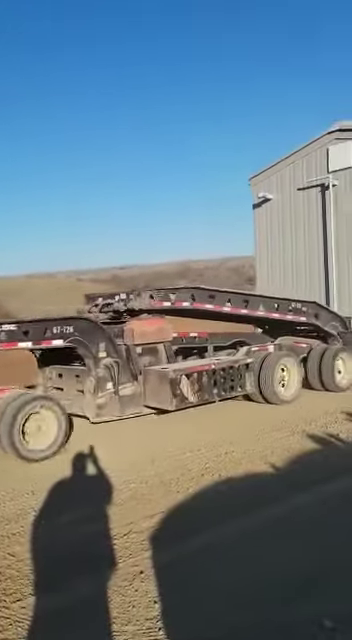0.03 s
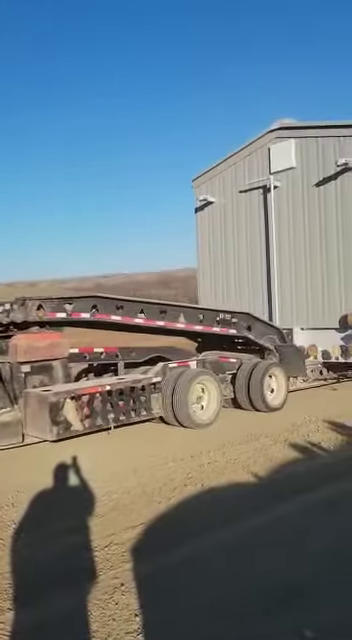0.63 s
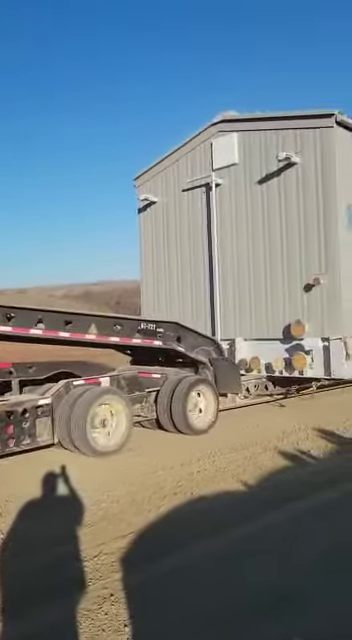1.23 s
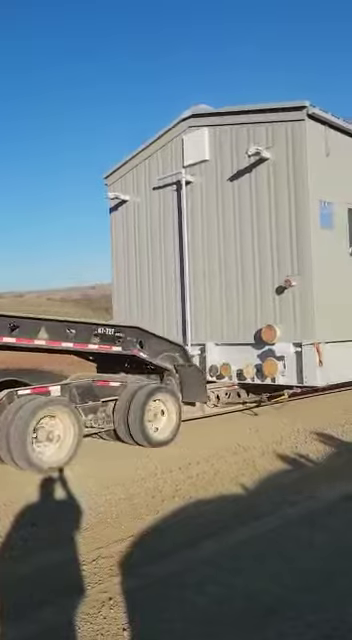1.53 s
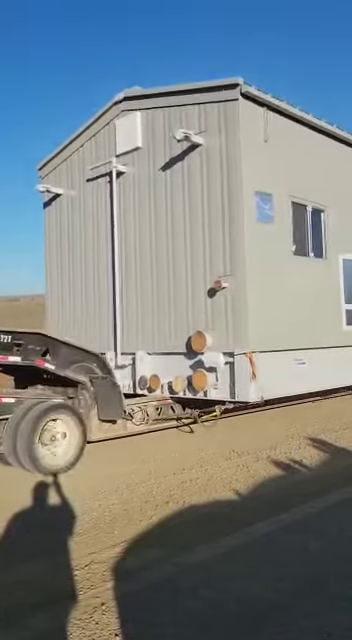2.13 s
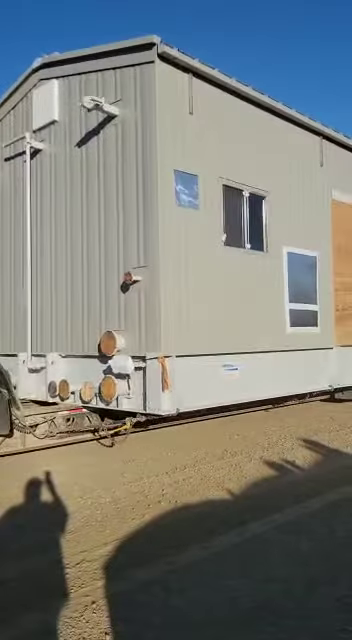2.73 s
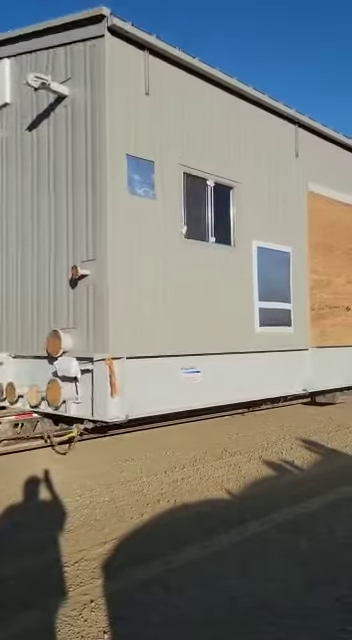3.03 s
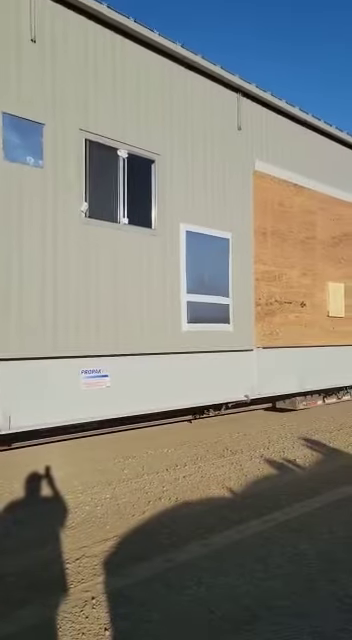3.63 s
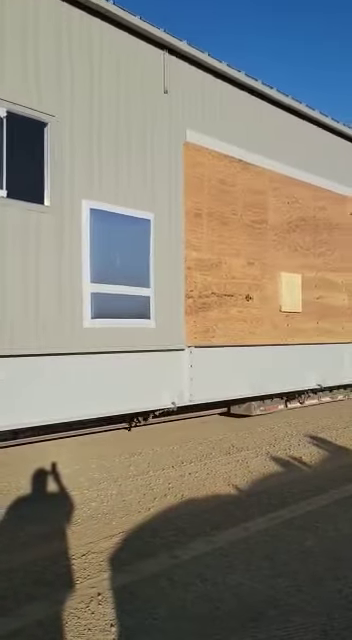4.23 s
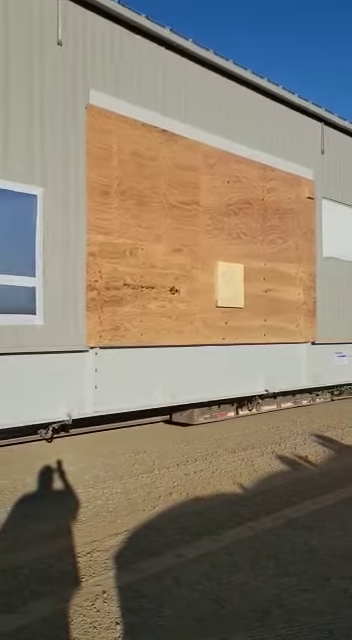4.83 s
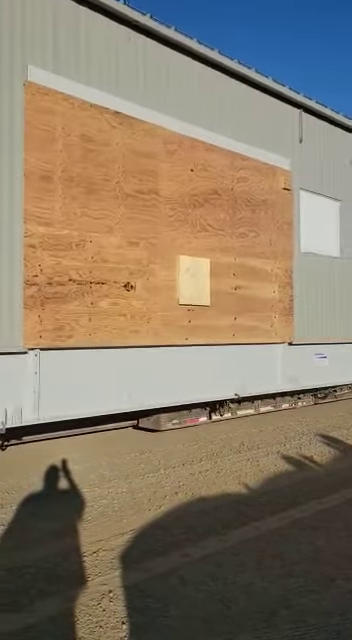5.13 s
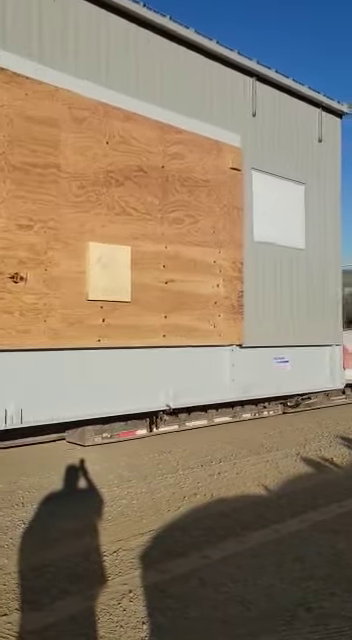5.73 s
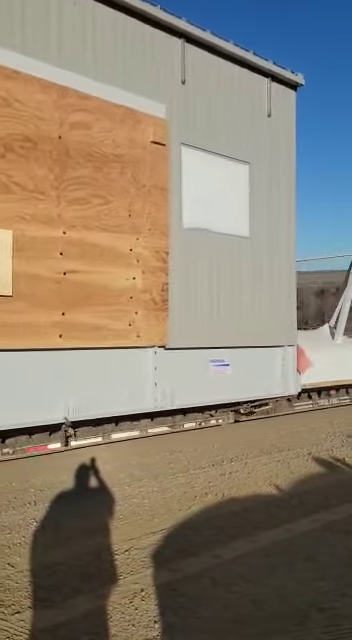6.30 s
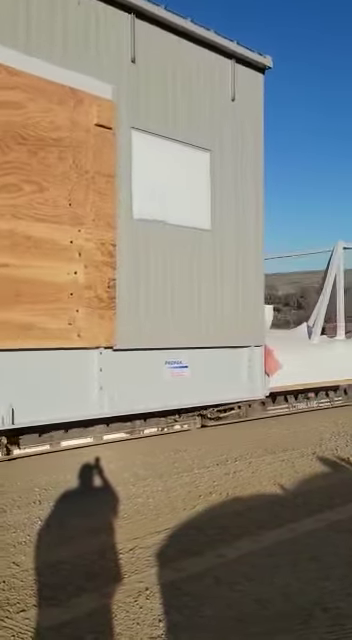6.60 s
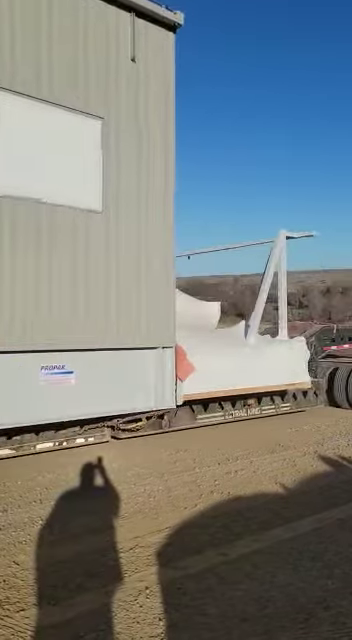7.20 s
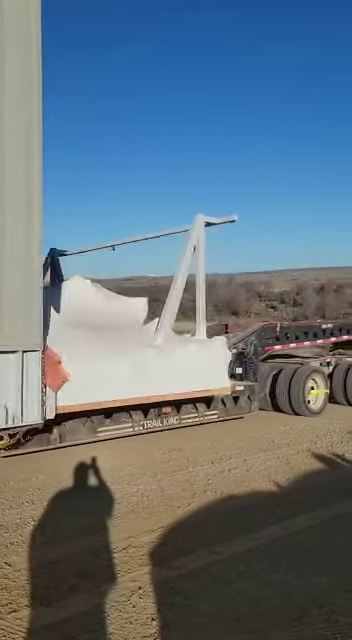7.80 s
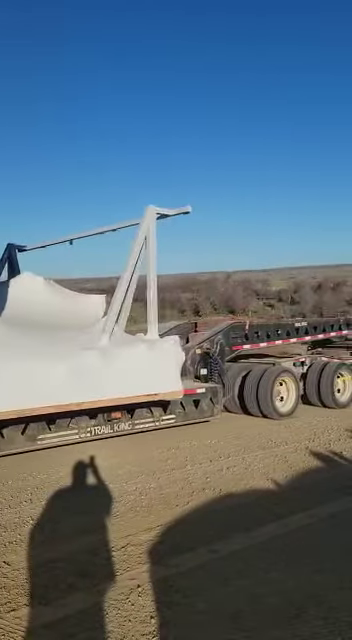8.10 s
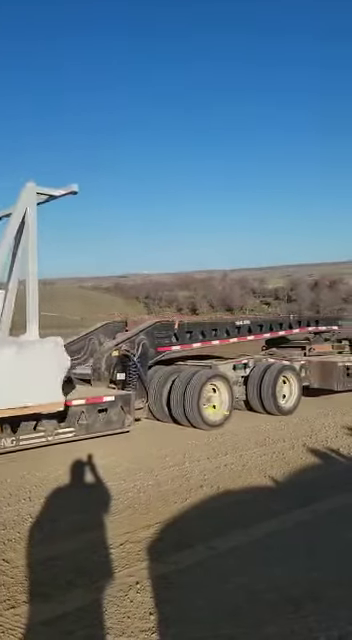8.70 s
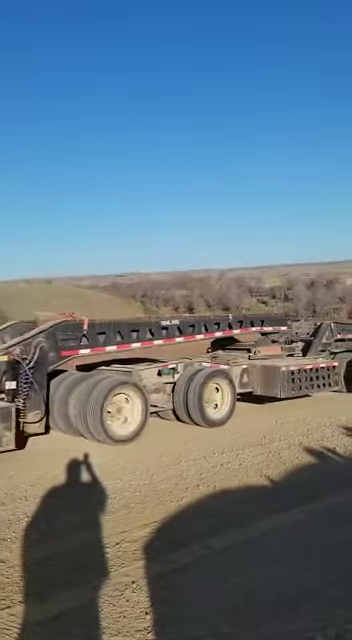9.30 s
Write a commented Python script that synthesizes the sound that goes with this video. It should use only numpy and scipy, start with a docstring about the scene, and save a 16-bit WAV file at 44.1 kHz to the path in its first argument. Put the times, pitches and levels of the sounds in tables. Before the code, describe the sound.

Heavy diesel trucks roar slowly past on a dirt road, with droning fans, brief turbo whistles and tyres crunching grit.

```python
"""Two trucks hauling a building

Two diesel trucks, one pulling and one pushing, move a building on a long trailer along a dirt road.
The lead truck roars close by and draws away. The two exhaust notes beat against each other, a cooling
fan drones and a turbocharger whistles. An air valve spits once, the trailer's steel rings and knocks,
and its tyres crunch grit as they roll past a microphone with two openings (ports), left and right."""
import sys
import numpy as np
from scipy import signal
from scipy.fft import rfft, irfft, next_fast_len
from scipy.io import wavfile

SR = 44100
rng = np.random.default_rng(int(sys.argv[2]) if len(sys.argv) > 2 else 0)


def wav_out(sig):
    """Save sig, one row per channel (or a flat mono array), as 16-bit PCM at SR to the path in sys.argv[1]."""
    wavfile.write(sys.argv[1], SR, np.round(np.clip(np.atleast_2d(sig).T, -1, 1) * 32767).astype(np.int16))


N = 412335
TIME = np.arange(N) / SR
FFT_SIZE = next_fast_len(N)
FFT_HZ = np.fft.rfftfreq(FFT_SIZE, 1 / SR)


def gain_of(db):
    """Turns decibels into a number to multiply by."""
    return 10 ** (np.asarray(db) / 20)


def evened(x):
    """Scales a sound to an average strength (rms) of one."""
    return x / np.sqrt(np.mean(x ** 2) + 1e-20)


def curves(rows, t=TIME):
    """Joins the points of each table column with straight lines in time."""
    times, *columns = np.transpose(rows)
    return [np.interp(t, times, column) for column in columns]


def spectra(rows, hz):
    """Joins the points of each table column from low pitch to high."""
    pitches, *columns = np.transpose(rows)
    return [np.interp(np.log(hz + 1), np.log(pitches), column) for column in columns]


def coloured(x, spectrum):
    """Shapes a sound by rows of (pitch_hz, relative_db), then sets its strength to one."""
    db, = spectra(spectrum, FFT_HZ)
    return evened(irfft(rfft(x, FFT_SIZE) * gain_of(db), FFT_SIZE)[..., :N])


def band(hz, pitch_hz, log_width):
    """Keeps what lies near one pitch; a log_width of 0.7 reaches about an octave each way."""
    return np.exp(-(np.log((hz + 1) / pitch_hz) / log_width) ** 2)


def noise():
    """Two unrelated white noises."""
    return rng.standard_normal((2, N))


def wander(rate_hz):
    """A random wobble of strength one, up to about rate_hz fast."""
    steps = np.arange(2048) / 200
    keep_slow = 1 / (1 + (np.fft.rfftfreq(len(steps), steps[1]) / rate_hz) ** 4)
    wobble = irfft(rfft(rng.standard_normal(len(steps))) * keep_slow)
    return np.interp(TIME, steps, evened(wobble))


def tone(hz, db, flutter, rate_hz):
    """A note whose strength and phase flutter at random."""
    angle = 2 * np.pi * (np.cumsum(hz) / SR + rng.random())
    wave = (1 + flutter * wander(rate_hz)) * np.cos(angle) + flutter * wander(rate_hz) * np.sin(angle)
    return gain_of(db) * np.sqrt(2) * wave


def restless(angle, half_width_hz):
    """Noise so narrow that it sounds like an unsteady note."""
    return wander(half_width_hz) * np.cos(angle) + wander(half_width_hz) * np.sin(angle)


def swell(middle_s, half_length_s):
    """A smooth hump of height one around a moment."""
    return np.exp(-((TIME - middle_s) / half_length_s) ** 2)


def passing(near_db, fall_db, side_m, emerge_db):
    """Level in dB of a source rolling by side_m away; it loses fall_db each time the distance doubles."""
    speed_m_per_s, closest_s = 1.89, 0.17
    distance_m = np.hypot(side_m, speed_m_per_s * (TIME - closest_s))
    # the level shifts by emerge_db as the push truck comes out from behind the building
    emerge_s, takes_s = 8.84, 0.28
    emerged = (1 + np.tanh(2 * (TIME - emerge_s) / takes_s)) / 2
    return near_db - fall_db * np.log2(distance_m / side_m) + emerge_db * emerged


# how far the lead truck has gone behind its load: time_s, share_0_to_1
AWAY = [(0, 0.18), (1.8, 0.15), (3.2, 0.71), (6, 0.88), (9.35, 0.92)]

def receding(x, near, far):
    """Fades from the near tone colour to the far one as the truck draws away."""
    away, = curves(AWAY)
    return evened((1 - away) * coloured(x, near) + away * coloured(x, far))


# how the ports differ, truck near and far: pitch_hz, left_minus_right_db, likeness_0_to_1, left_lead_rad
PORTS_NEAR = [(77, -0.7, 0.999, 0.13), (125, -0.6, 0.999, 0.03), (290, -3.6, 0.984, -0.46),
              (520, -8.4, 0.88, -0.74), (1100, -8.5, 0.73, -1.43), (1600, -11.1, 0.35, -0.82),
              (2100, -5.8, 0.77, 0.1), (2600, 5.7, 0.56, 1.75), (3100, -0.5, 0.74, 3.0),
              (4200, -8.0, 0.59, 3.02), (6300, -9.1, 0.27, 2.95), (7400, -1.6, 0.27, 0.42),
              (9500, -2.5, 0.14, -0.68), (13500, -7.1, 0.02, 0.91)]
PORTS_FAR = [(77, -0.6, 0.987, 0.16), (125, -0.6, 0.979, 0.04), (290, -0.8, 0.972, -0.38),
             (520, -4.7, 0.88, -0.55), (1100, -9.7, 0.8, -0.88), (1600, -10.3, 0.57, 0.53),
             (2100, -5.0, 0.8, 0.68), (2600, 2.8, 0.31, 1.46), (3100, 0.0, 0.65, 3.63),
             (4200, -8.9, 0.58, 3.74), (6300, -10.7, 0.25, 4.53), (7400, -1.8, 0.29, 7.14),
             (9500, -0.2, 0.06, 7.4), (13500, -6.6, 0.1, 7.43)]

def ports(pair):
    """Mixes two unrelated sounds into a left and right, partly alike but apart in level and phase."""
    hz, t, (common, own) = signal.stft(pair, SR, nperseg=2048)
    away, = curves(AWAY, t)
    near_db, near_like, near_turn = spectra(PORTS_NEAR, hz[:, None])
    far_db, far_like, far_turn = spectra(PORTS_FAR, hz[:, None])
    left_gain = gain_of((1 - away) * near_db + away * far_db)
    like = (1 - away) * near_like + away * far_like
    turn = np.exp(1j * np.angle((1 - away) * np.exp(1j * near_turn) + away * np.exp(1j * far_turn)))
    left = left_gain * (like * turn * common + np.sqrt(1 - like ** 2) * own)
    centre = np.sqrt(1 + left_gain ** 2 + 2 * left_gain * like * turn.real) / 2  # keeps the sum's level
    return signal.istft(np.array([left, common]) / centre, SR)[1][:, :N]


def far_hiss():
    """A faint, even hiss lies under everything."""
    colour = [(4000, -6), (7600, 0), (8400, 2), (9000, -13), (12000, -12), (15000, -22)]
    return gain_of(-72) * coloured(noise(), colour)


def breeze():
    """Light air buffets each port on its own."""
    colour = [(12, -6), (28, -4), (50, 7), (100, -10), (400, -43), (2000, -90)]
    return gain_of(-48 + 3.8 * wander(3)) * coloured(noise(), colour)


# tone colour of the sizzle: pitch_hz, relative_db
SIZZLE = [(8800, -30), (9350, -16), (9520, 7), (9700, -2), (10300, -31)]

def sizzle():
    """A thin, high sizzle fades as the trucks move on."""
    db = passing(near_db=-65.5, fall_db=11, side_m=7, emerge_db=-2)
    return gain_of(db) * coloured(noise()[0], SIZZLE)


# notes of the trailer's loose steel: pitch_hz, half_width_hz, level_db
STEEL_NOTES = [(1450, 9, -53), (1695, 13, -51), (3698, 18, -59), (4850, 16, -54), (4905, 22, -55),
               (6525, 18, -63)]

def loose_steel():
    """The rough road shakes loose steel, which rings faintly as the front wheels go by."""
    notes = sum(gain_of(db) * restless(2 * np.pi * hz * TIME, width) for hz, width, db in STEEL_NOTES)
    return swell(middle_s=3.2, half_length_s=0.6) * notes


# jolts to the trailer: start_s, level_db
KNOCKS = [(8.671, -26.5), (8.858, -30), (8.892, -32.5)]
# notes of its frame: pitch_hz, relative_db, ring_s (time to fade by 60 dB)
FRAME_NOTES = [(772, -5, 0.24), (910, -4, 0.087), (983, -5.5, 0.13), (1100, -7, .08), (1803, -13, .15)]

def frame_knocks():
    """Each jolt sets the trailer's steel frame ringing."""
    out = np.zeros(N)
    for start_s, blow_db in KNOCKS:
        t = np.maximum(TIME - start_s, 0)
        for hz, db, ring_s in FRAME_NOTES:
            out += gain_of(blow_db + db - 60 * t / ring_s) * np.sin(2 * np.pi * hz * t)
    return out


# swells of a dry rasp: middle_s, half_length_s, pitch_hz, level_db
RASPS = [(0.25, 0.56, 3380, -50), (1.65, 0.87, 2020, -37), (3.3, 0.76, 850, -39), (6.0, 0.35, 1960, -45),
         (7.0, 0.15, 1960, -44), (8.3, 1.0, 2600, -52)]

def rasp():
    """A narrow band of coarse noise comes and goes."""
    coarse = rfft(noise() * gain_of(1.5 * wander(36)), FFT_SIZE)
    out = np.zeros((2, N))
    for middle_s, half_s, pitch_hz, db in RASPS:
        narrow = irfft(coarse * band(FFT_HZ, pitch_hz, log_width=0.17), FFT_SIZE)[:, :N]
        out += gain_of(db) * swell(middle_s, half_s) * evened(narrow)
    return out


# stones popping under the tyres: start_s, level_db, pitch_hz, log_width
STONES = [(2.412, -31, 6200, 0.18), (3.334, -31, 6250, 0.18), (5.47, -34, 4200, 0.36),
          (5.5, -52, 12500, 0.24), (6.052, -29, 2900, 0.65), (6.078, -35, 4000, .5),
          (6.129, -32, 3700, 0.46), (6.143, -34, 3700, .5), (7.915, -54, 10000, .3),
          (8.87, -53, 12000, .25), (9.06, -53, 12970, .25)]

def stones(attack_s=0.0015, decay_s=0.0084, left_db=-11):
    """Each stone cracks with a short, bright burst, weaker on the left."""
    out = np.zeros((2, N))
    t = np.arange(4096) / SR
    hz = np.fft.rfftfreq(len(t), 1 / SR)
    envelope = np.minimum(t / attack_s, 1) * np.exp(-t / decay_s)
    for start_s, db, pitch_hz, log_width in STONES:
        white = rng.standard_normal((2, len(t)))
        burst = evened(irfft(rfft(white) * band(hz, pitch_hz, log_width))) * envelope
        part = out[:, round(start_s * SR):][:, :len(t)]
        part += gain_of(db) * burst[:, :part.shape[1]]
    out[0] *= gain_of(left_db)
    return out


# swells and dips in the hiss and fizz: middle_s, hiss_lift_db, fizz_lift_db
HISS_SWELLS = [(1.85, 2, 2), (3.3, 2.5, 6), (4.3, 0.5, 7), (5.45, 1, 0), (6.1, 1.1, 5), (7.7, 0, 2),
               (8.5, -0.5, 1)]
# tone colours of the hiss and the finer fizz above it: pitch_hz, relative_db
HISS = [(2000, -16), (2900, -0.5), (3170, 0.5), (3720, 1.5), (4350, -0.7), (4880, 2.5), (5450, -4),
        (5850, -2.5), (6300, -0.2), (6750, -2), (7150, -11), (8100, -12), (8700, -50), (11000, -38)]
FIZZ = [(7000, -3.5), (8700, -10.5), (9500, -2.5), (10800, -12), (12300, -5), (14000, -4), (15100, 1),
        (15800, -5.5)]

def tyres(grains_per_s=900, crumble_s=0.002, swell_s=0.53):
    """Air rushes, and grit is crushed in clumps under the treads."""
    hiss_db = passing(near_db=-40.5, fall_db=6.5, side_m=6.5, emerge_db=1.5)
    fizz_db = passing(near_db=-42.5, fall_db=10, side_m=1.72, emerge_db=10)
    for middle_s, hiss_lift_db, fizz_lift_db in HISS_SWELLS:
        hiss_db += hiss_lift_db * swell(middle_s, swell_s)
        fizz_db += fizz_lift_db * swell(middle_s, swell_s)
    clumps = wander(18)
    chance = grains_per_s / SR * gain_of(3 * clumps)  # clumps crowd and thin the grains
    strength = gain_of(3 * np.minimum(rng.exponential(1, N), 4))
    grains = strength * rng.choice([-1, 1], N) * (rng.random(N) < chance)
    crumble = rng.standard_normal((2, 512)) * np.exp(-np.arange(512) / SR / crumble_s)
    grit = evened(signal.oaconvolve(grains[None], crumble, axes=1)[:, :N])
    hiss = gain_of(hiss_db + 0.55 * clumps) * coloured(noise() + 0.36 * grit, HISS)
    fizz = gain_of(fizz_db + clumps) * coloured(noise() + 0.55 * grit, FIZZ)
    return hiss + fizz


# tone colour of the valve's spit: pitch_hz, relative_db
VALVE_AIR = [(1500, -20), (3000, 0), (4800, 1), (5500, -6), (6200, 4), (6800, -1), (7600, -2), (8800, -14),
             (9600, -10), (11000, -9), (13500, -5), (15800, -12)]

def air_valve(start_s=1.528, attack_s=0.017, hold_s=0.03, spit_db_per_s=240, leak_db_per_s=14):
    """One short spit of compressed air, then a thin leak that fades slowly."""
    opening = np.clip((TIME - start_s) / attack_s, 0, 1)
    fading_s = np.maximum(TIME - start_s - attack_s - hold_s, 0)
    spit = gain_of(-32 - spit_db_per_s * fading_s) * coloured(noise(), VALVE_AIR)
    leak = gain_of(-48.5 - leak_db_per_s * fading_s) * coloured(noise(), FIZZ)
    return opening * (spit + leak)


# turbocharger whistles: middle_s, pitch_hz, glide_hz_per_s, level_db
WHISTLES = [(1.18, 2560, -55, -42), (2.66, 2525, 40, -48), (3.0, 2543, 61, -43.5), (3.85, 2668, -58, -52),
            (6.35, 2635, -15, -65), (7.6, 2712, 9.5, -59), (8.2, 2700, -21, -53), (9.25, 2600, 68, -50)]

def turbo(swell_s=0.24):
    """The spinning turbocharger whistles in brief, gliding swells."""
    return sum(swell(s, swell_s) * tone(hz + glide * (TIME - s), db, flutter=0.25, rate_hz=14)
               for s, hz, glide, db in WHISTLES)


# a hollow howl in the lead truck's roar: time_s, pitch_hz, level_db
HOWL = [(0, 515, -35.5), (2.5, 517, -34), (3.6, 538, -36.5), (4.7, 552, -38), (5.3, 572, -48),
        (6.2, 587, -46), (7.5, 600, -57)]

def howl():
    """A narrow resonance climbs in pitch as the lead truck draws away."""
    hz, db = curves(HOWL)
    return gain_of(db) * restless(2 * np.pi * np.cumsum(hz) / SR, half_width_hz=13.4)


# fan speed, wavering at first and then following the push engine: time_s, blade_passes_hz
FAN_SPEED = [(0, 348), (1.6, 348), (1.95, 351.5), (2.65, 345), (3.1, 349), (3.6, 344.6), (4.9, 342.7),
             (6.1, 341.6), (7.0, 341.6), (7.8, 348), (9.35, 351)]
# loudness of its drone: time_s, level_db
FAN_LEVEL = [(0, -35), (0.4, -26.5), (1.05, -53), (1.55, -24), (2.25, -28.5), (2.6, -24), (2.92, -23.5),
             (3.02, -28), (3.14, -23), (3.5, -23.5), (3.8, -24.5), (4.8, -27), (6.1, -29.5), (6.9, -33),
             (7.7, -39), (8.2, -53), (8.95, -38), (9.35, -40)]

def cooling_fan():
    """The passing blades chop the air into a drone."""
    db = curves(FAN_LEVEL)[0] + 0.42 * wander(2.8)
    return tone(curves(FAN_SPEED)[0], db, flutter=0.1, rate_hz=9.8)


# push engine speed, sagging under load and picking up again: time_s, cycle_hz
PUSH_SPEED = [(0, 12.15), (1.1, 12.34), (1.6, 12.25), (2.1, 12.29), (2.6, 12.17), (3.2, 12.19),
              (4.6, 12.07), (6.9, 12.02), (7.8, 12.18), (9.35, 12.34)]
# its exhaust's swing in loudness, hidden by the building and coming out again: time_s, level_db
PUSH_LEVEL = [(0, -23), (0.5, -20.5), (1.6, -20), (2.5, -22.5), (2.72, -30), (3.2, -25), (4.3, -30),
              (4.8, -34.5), (7.1, -34.5), (7.7, -30.5), (8.3, -35.5), (9.0, -28.5), (9.35, -34)]
# its exhaust notes: cycle_multiple, relative_db, share_of_swing_0_to_1
PUSH_NOTES = [(5, -18, .1), (6, -20, .2), (7, -3.5, .3), (8, -24, .4), (9, -14.5, .1), (10, -2, 1),
              (11, -17, .5), (19, -23, .6), (22, -12, .5), (23, -12.5, .1), (24, -19.5, 1)]

def push_exhaust(steady_db=-31.5):
    """The push engine hums at multiples of its cycle; a steady part bends round the building."""
    cycle_hz, = curves(PUSH_SPEED)
    swing_db = curves(PUSH_LEVEL)[0] + 0.32 * wander(2.1)
    out = np.zeros(N)
    for multiple, db, share in PUSH_NOTES:
        level_db = (1 - share) * steady_db + share * swing_db + db
        out += tone(multiple * cycle_hz, level_db, flutter=0.0092 * multiple, rate_hz=5.9)
    return out


def whine(gear_ratio=29.9):
    """A spinning part geared to the push engine whines."""
    db = passing(near_db=-34, fall_db=11.5, side_m=9.3, emerge_db=-9)
    return tone(gear_ratio * curves(PUSH_SPEED)[0], db, flutter=0.38, rate_hz=5.6)


# lead engine speed, with the same slow sag and recovery: time_s, firing_hz
LEAD_SPEED = [(0, 78.36), (1.1, 79.25), (2.1, 76.93), (4.2, 76.73), (6.5, 76.07), (7.4, 78.1),
              (9.35, 77.14)]
# loudness of its exhaust: time_s, level_db
LEAD_LEVEL = [(0, -19.5), (0.41, -26.5), (0.85, -20), (1.45, -25), (2.6, -26), (2.9, -34), (3.55, -26.5),
              (4.2, -27), (4.9, -24.5), (5.5, -27.5), (6.85, -26.5), (7.4, -29.5), (8.1, -26.5),
              (9.35, -35)]
# its exhaust notes: cycle_multiple, relative_db
LEAD_NOTES = [(6, 1), (12, -15.5), (18, -19.5), (22, -20.5), (23, -21.5), (40, -21)]

def lead_exhaust(cylinders=6):
    """Each cylinder fires once a cycle, making notes that beat against the push truck's."""
    cycle_hz = curves(LEAD_SPEED)[0] / cylinders
    level_db = curves(LEAD_LEVEL)[0] + 0.55 * wander(1.7)
    return sum(tone(multiple * cycle_hz, level_db + db, flutter=0.015 * multiple, rate_hz=4.6)
               for multiple, db in LEAD_NOTES)


def exhaust_pipe(x, pipe_hz, echo):
    """Sound bounces back from the pipe's open end, which lifts the pipe's own notes."""
    round_trip = np.exp(-2j * np.pi * FFT_HZ / pipe_hz)
    return irfft(rfft(x, FFT_SIZE) / (1 - echo * round_trip), FFT_SIZE)[..., :N]


# tone colours of the roar and clatter, lead truck near and far: pitch_hz, relative_db
ROAR_NEAR = [(25, -24), (48, -24), (62, -13), (100, -6), (140, -3), (175, -2), (225, 1.5), (260, -2.5),
             (293, 6), (335, -2.5), (410, -7.5), (500, -7), (620, -10), (720, -10), (900, -18.5),
             (1300, -56.5)]
ROAR_FAR = [(25, -20), (48, -7), (61, 1.5), (100, 3.5), (160, 0), (190, 1), (235, 1), (260, 0.5),
            (283, 0.5), (312, -1.5), (365, 1), (425, -5), (490, -2.5), (545, -7.5), (690, -7), (770, -8.5),
            (900, -17.5), (1300, -53.5)]
CLATTER_NEAR = [(500, -28), (800, 3), (1100, 0.5), (1500, 0), (2000, -2.5), (2350, -7.5), (2600, -8),
                (2900, -26), (3600, -52)]
CLATTER_FAR = [(500, -4.5), (750, -10.5), (870, -3), (1000, 0), (1260, 0.5), (1450, -2), (1650, -3.5),
               (2050, -7), (2550, -12), (2900, -20.5), (3600, -56)]
# the roar swells and sinks as the load goes by: middle_s, half_length_s, change_db
SURGES = [(1.7, 0.97, 1.27), (3.3, 0.33, 0.9), (4.3, 1.5, -1.5), (6.5, 1.1, 1)]

def engine_roar():
    """Puffs of gas swell at every firing of the lead engine; its casing clatters more evenly."""
    firing = np.cos(2 * np.pi * np.cumsum(curves(LEAD_SPEED)[0]) / SR)
    puffs = exhaust_pipe(noise() * (1 + 0.08 * firing), pipe_hz=260, echo=0.061)
    rattle = exhaust_pipe(noise() * (1 + 0.033 * firing), pipe_hz=251, echo=0.039)
    surge_db = sum(db * swell(middle_s, half_s) for middle_s, half_s, db in SURGES)
    roar_db = passing(near_db=-17, fall_db=6.5, side_m=4.18, emerge_db=3) + surge_db
    clatter_db = passing(near_db=-27.5, fall_db=5, side_m=4.85, emerge_db=2.5)
    clatter_db += 0.25 * surge_db + 0.48 * wander(16)
    roar = gain_of(roar_db) * receding(puffs, ROAR_NEAR, ROAR_FAR)
    clatter = gain_of(clatter_db) * receding(rattle, CLATTER_NEAR, CLATTER_FAR)
    return roar + clatter


def scene():
    """Noises spread over both ports, which share the tones; stones and breeze reach each directly."""
    pair = engine_roar() + rasp() + tyres() + air_valve() + far_hiss()
    pair[0] += (lead_exhaust() + push_exhaust() + howl() + cooling_fan() + whine() + turbo()
                + sizzle() + frame_knocks() + loose_steel())
    return ports(pair) + stones() + breeze()


def record(dry, cutoff_hz=15750):
    """Cuts away the very highest treble."""
    low_pass = signal.firwin(511, cutoff_hz, window=("kaiser", 9), fs=SR)
    return signal.oaconvolve(dry, low_pass[None], "same")


dry = scene()
out = record(dry)
wav_out(out)
```